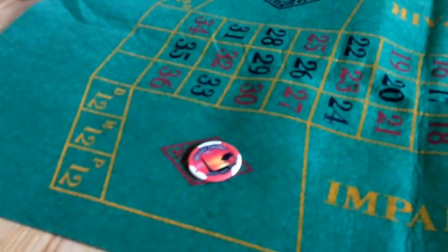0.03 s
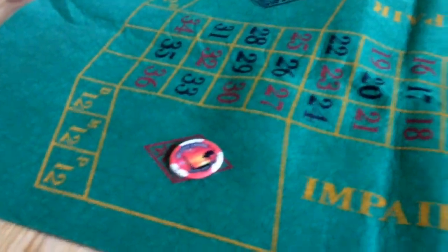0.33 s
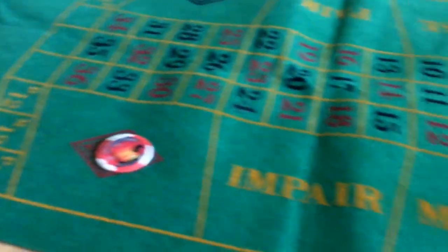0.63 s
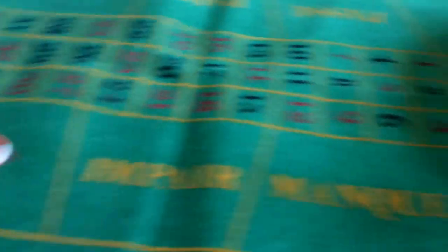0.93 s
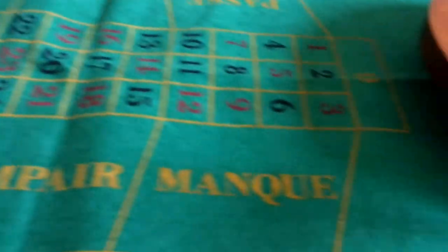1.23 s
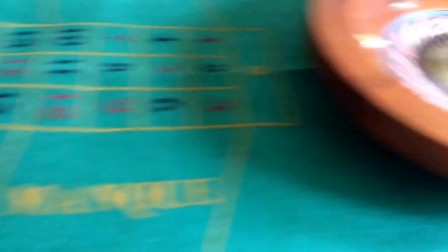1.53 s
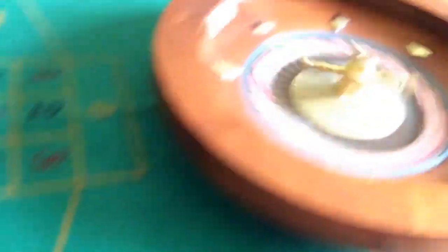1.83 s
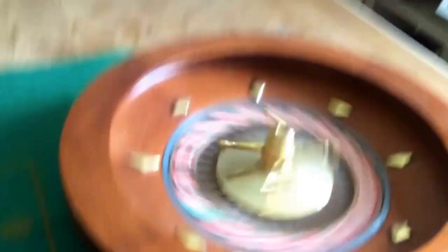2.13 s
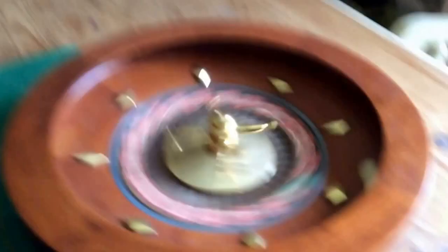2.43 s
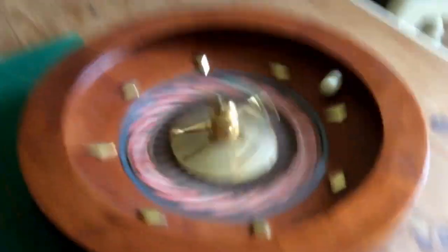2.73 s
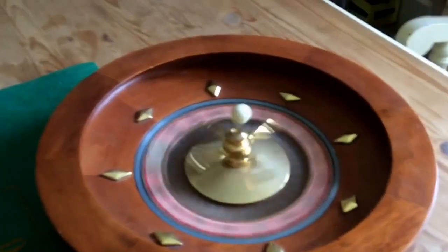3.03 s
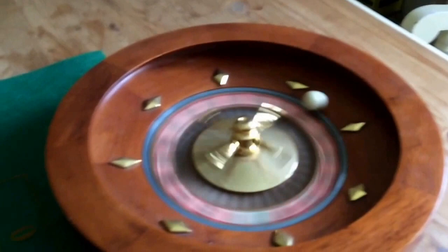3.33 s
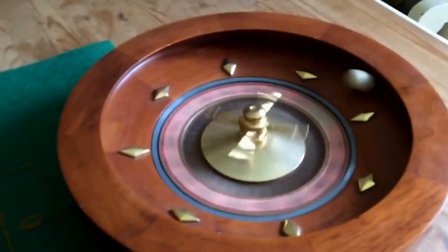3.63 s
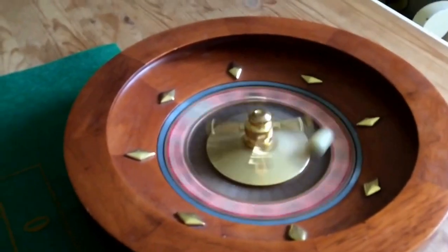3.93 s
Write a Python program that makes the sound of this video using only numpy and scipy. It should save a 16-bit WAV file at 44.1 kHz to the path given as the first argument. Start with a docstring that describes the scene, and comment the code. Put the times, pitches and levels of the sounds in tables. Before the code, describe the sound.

A wooden roulette wheel is spun with a gritty scrape and a rolling clatter. The ball knocks around the bowl, then cracks against metal studs and clinks on the ringing brass centre, close by in a small room.

```python
"""A wooden roulette wheel on a table in a small room. First come faint clinks and two dull bumps that set the
table booming. From about 1 s the wheel is spun: a gritty scrape swells and fades, tiny rolling contacts rumble
and clatter, and the wooden bowl knocks under the hand that turns it. From about 2.2 s the ball is launched and
knocks round the wooden bowl; from about 2.7 s it also cracks against metal studs, then clanks on the metal
centre cone and sets the brass turret ringing. Each impact is a brief broadband pulse; bowl, cone and turret
ring on in damped modes."""
import sys
import numpy as np
from scipy import signal
from scipy.fft import rfft, irfft
from scipy.io import wavfile
from scipy.ndimage import uniform_filter1d

SR = 44100
rng = np.random.default_rng(int(sys.argv[2]) if len(sys.argv) > 2 else 0)


def unload_audio(sound):
    """Save the sound as a 16-bit wav file, at the path given as the first command line argument."""
    columns = np.transpose(np.atleast_2d(sound))
    # keep every value between -1 and 1, then stretch to whole-number steps
    steps = np.round(np.clip(columns, -1, 1) * 32767)
    wavfile.write(sys.argv[1], SR, steps.astype(np.int16))


N = 176400

# Dull bumps on the table: start_s, level_db
BUMPS = [(0, -51.5), (0.085, -45.5), (0.587, -28), (0.826, -32)]
# Knocks on the wooden bowl: start_s, level_db, treble_db, body_db
BOWL_KNOCKS = [(1.0135, -47, -6, 16), (1.1193, -26, -61, -16.5), (1.1926, -10, -31, -7.5),
               (1.456, -19.5, -57, -21), (1.4633, -16, -57, -24), (1.4744, -16, -66, -33),
               (1.4818, -12, -38, -7), (1.516, -17, -36, -2), (1.5535, -15, -26.5, -25),
               (1.574, -16.5, -26, -18), (1.6181, -10, -30, -6), (1.6636, -17, -30, -6),
               (1.6693, -14, -30.5, -12), (1.722, -20.5, -34, -13), (1.7635, -25.5, -34, -11),
               (1.8117, -24, -45, 0), (1.8823, -22.5, -50, -38), (2.0486, -27, -37, -7),
               (2.094, -32.5, -66, -19), (2.1917, -28, -105, -7), (2.2195, -14, -52, -19),
               (2.2397, -19, -40, -7), (2.2714, -18, -35, -13), (2.2892, -19, -45, -12),
               (2.4354, -24.5, -40, -9), (2.7388, -4.5, -23.5, -11.5), (2.7971, -8.5, -25, -21),
               (2.842, -10.5, -34, -17.5), (2.883, -13, -26, -26), (2.9153, -17, -33, -18),
               (3.2301, -8, -1, -48), (3.3126, -3, -21, -11), (3.3839, -7.5, -26, -22),
               (3.7148, -6, -19, -11), (3.721, -3.5, -18, -58), (3.7268, -12, -8.5, 5),
               (3.7809, -11, -27, -14), (3.8241, -14, -37, -36), (3.8609, -17, -36, -26)]
# Hard hits on the studs: start_s, level_db, thud_db
STUD_HITS = [(2.657, -11.5, -32), (3.1503, -6.5, -31), (3.562, -6.5, -14)]
# Metal hits on the centre cone and on the separators between pockets: start_s, level_db, tilt_db_per_octave,
# hollow_pitch_hz
CONE_HITS = [(2.9471, -21.5, 0.5, 1333), (3.1304, -21.5, -1.5, 3970), (3.206, -20, -0.5, 2060),
             (3.2302, -14.5, 4, 1856), (3.2861, -19, 2, 1512), (3.6334, -19, -0.5, 2950),
             (3.917, -23, -2, 2260)]
# Hits on the turret: start_s, ring_db, lowest_mode_db, cross_arms_db, tick_db
TURRET_HITS = [(0.076, -69, -56.5, -63, -46), (0.2556, -43.5, -56.5, -66, -39),
               (2.9735, -20.5, -19, -40, -24.5), (3.0544, -14, -18, -8, -14.5),
               (3.1866, -15, -22, -45, -20), (3.437, -9, -16.5, -17, -17), (3.478, -17, -22, -16, -20.5),
               (3.506, -26.5, -24, -38, -21.5), (3.5953, -16.5, -24.5, -34, -21),
               (3.9405, -27, -28, -61, -37), (3.9945, -12, -23, -14, -21)]

# Envelopes of the wheel's motion: time_s, level_db
RUMBLE_ENVELOPE = [(1.3, -76), (1.65, -48.5), (1.95, -61), (2.55, -55), (2.8, -56), (3.45, -52),
                   (3.65, -37), (3.85, -45), (4, -57)]
ROLLING_ENVELOPE = [(1.1, -81.5), (1.17, -56.5), (1.37, -67.5), (1.41, -43.5), (1.47, -41), (1.53, -40),
                    (1.68, -41.5), (1.82, -42), (1.9, -46.5), (2.15, -54.5), (2.4, -49), (2.6, -54.5),
                    (2.8, -51.5), (3.1, -55), (3.87, -42.5), (4, -55)]

# Normal modes of each body: frequency_hz, relative_level_db, t60_s
TABLE_MODES = [(130.4, 1, 0.58), (155.2, -3.5, 0.37), (174.4, 3, 0.31), (261.6, -2.5, 0.19)]
RIM_MODES = [(531, -8, .15), (1448, 0, .17), (2375, -8, .06)]
BOWL_MODES = [(531, -11, .14), (640, -13, .06), (1444, -7, .12), (1830, -5, .06), (2373, -3, .06),
              (2497, -1, .06), (2690, -2, .07), (2858, -2, .07), (3022, -5, .06), (3321, -6, .06),
              (5640, -11, .03)]
CONE_MODES = [(1485, -5.5, 0.054), (1774, -5, 0.06), (2006, 7, 0.027), (2600, 7, 0.015),
              (2905, -4.5, 0.094), (3960, -6.5, 0.12), (5580, -6, 0.025), (6300, -3.5, 0.028),
              (9450, -7, 0.014)]
TURRET_MODES = [(4443, -7, .2), (5768, -12, .19), (7234, -18, .15), (8850, -28, .08), (10570, -36, .07),
                (12230, -33, .08)]
TURRET_LOWEST_MODE = [(2179, -5.5, .4)]
CROSS_ARM_MODES = [(4660, 3, 0.016), (5770, -6, 0.039), (7780, -4, 0.029), (8300, -20, 0.054),
                   (9000, -12.5, 0.036), (9970, -19.5, 0.059)]

# Spectral densities of the sustained noises: frequency_hz, relative_level_db
AMBIENT_SPECTRUM = [(25, -4), (70, 1), (200, -4), (400, -14), (1100, -13), (2500, -24), (9000, -27),
                    (15500, -34)]
RUMBLE_SPECTRUM = [(40, -35), (110, -7.5), (200, -1.5), (290, -7), (420, -9), (800, -42)]
ROLLING_SPECTRUM = [(40, -38), (120, -4.5), (175, 5), (400, -11), (540, 5), (1200, 1), (2400, 6.5),
                    (3400, 0), (4500, -29), (8000, -21), (15500, -42)]
RASP_SPECTRUM = [(300, -32), (900, -15), (2400, 8), (5000, -6), (8000, -14), (15500, -26)]
# Spectral densities of the impacts: frequency_hz, relative_level_db
THUMP_SPECTRUM = [(30, -8.5), (110, 15.5), (400, -11.5), (650, 0), (1100, -25.5), (5000, -54)]
WOOD_SPECTRUM = [(60, -37), (170, -13.5), (380, -13.5), (560, 8), (800, 2), (1100, -5), (1800, -5),
                 (2700, 2), (3900, -0.5), (5700, 6), (7500, 0.5), (10000, -6), (15500, -22)]
STUD_SPECTRUM = [(100, -17.5), (600, 5.5), (1200, 4.5), (2600, 13.5), (4000, 10.5), (5800, 8.5), (9000, 9),
                 (11500, 1.5), (15500, -0.5)]
METAL_SPECTRUM = [(100, -21), (500, 4), (1300, 12.5), (2200, 3.5), (4500, 15.5), (7500, -5), (10000, -4),
                  (15500, -52)]

# Reverberation time of the room: frequency_hz, t60_s
ROOM_DECAY = [(500, 0.24), (6000, 0.21), (15000, 0.32)]
# Reflections from near surfaces: delay_s, level_db
EARLY_REFLECTIONS = [(.0032, -20), (0.0108, -17.5)]

KNOCK_DB, BOWL_RING_DB, TABLE_RING_DB, CONE_RING_DB = -3.5, -15, -43, -5  # added to each hit's level
GRAINS_PER_S, GRAIN_SPREAD_DB = 3200, 3.5
RIM_DB, RIM_DETUNE, RIM_SPOT_S = -1, 0.009, 0.05
RATTLES_PER_S, RATTLE_SPREAD_DB, RATTLE_DB = 85, 5, -4
RASP_PEAK_S, RASP_DB, RASP_RISE_DB_PER_S, RASP_FALL_DB_PER_S, GRIT_DB = 1.454, -36.5, 256, 90, 2
SPOT_COLOUR_DB, SPOT_DETUNE = 2, 0.05
AMBIENT_DB, REVERB_DB = -70, -6.5
LOW_CUT_HZ, HIGH_CUT_HZ = 36, 15550
BIN_HZ = np.fft.rfftfreq(2048, 1 / SR)  # frequency grid of the impact spectra


def amp(db):
    return 10 ** (np.asarray(db) / 20)


def unit_rms(x):
    return x / np.sqrt(np.mean(x ** 2) + 1e-20)


def curve_at(points, hz=BIN_HZ):
    """Interpolation on a logarithmic frequency axis."""
    point_hz, value = np.transpose(points)
    return np.interp(np.log(hz + 1), np.log(point_hz + 1), value)


def envelope(points):
    """Gain over time, interpolated in decibels."""
    return amp(np.interp(np.arange(N) / SR, *np.transpose(points)))


def add(mix, start_s, sound):
    """Superposition: a sound sums into the mix."""
    part = mix[max(round(start_s * SR), 0):][:len(sound)]
    part += sound[:len(part)]


def coloured(x, spectrum):
    """Linear filtering by a spectrum, scaled to rms 1."""
    gain = amp(curve_at(spectrum, np.fft.rfftfreq(len(x), 1 / SR)))
    return unit_rms(irfft(rfft(x) * gain, len(x)))


def impact(colour_db, rise_s):
    """A brief contact radiates a broadband pulse, here with the energy of 1 ms at rms 1."""
    t = np.arange(2 * len(BIN_HZ) - 2) / SR
    shape = t / rise_s * np.exp(-t / rise_s)
    burst = shape * rng.standard_normal(len(t))
    for _ in range(4):  # flatten the spectrum while keeping the envelope
        spectrum = rfft(burst)
        burst = shape * np.sign(irfft(spectrum / (abs(spectrum) + 1e-9)))
    log_gain = np.log(amp(np.r_[colour_db, colour_db[-2:0:-1]]))
    minimum_phase = np.exp(np.conj(signal.hilbert(log_gain)))
    pulse = np.fft.ifft(np.fft.fft(burst) * minimum_phase).real
    return pulse / np.sqrt(np.sum(pulse ** 2) / SR * 1000)


def ring(modes, rise_s, scatter_db, tilt_db=0):
    """Free vibration is a sum of damped modes, whose balance varies with the struck spot."""
    t = np.arange(SR * 3 // 4) / SR
    hz, db, t60 = np.transpose(modes)[:, :, None]
    octaves = np.log2(hz / np.exp(np.log(hz).mean()))
    db = db + tilt_db * octaves + scatter_db * rng.standard_normal(hz.shape)
    waves = amp(db - 60 * t / t60) * np.sin(2 * np.pi * (hz * t + rng.random(hz.shape)))
    return waves.sum(0) * (1 - np.exp(-t / rise_s))


def spot_colour():
    """The bowl's response depends on the point of contact: random peaks and dips in dB."""
    return SPOT_COLOUR_DB * unit_rms(uniform_filter1d(rng.standard_normal(len(BIN_HZ)), size=22))


def ambience():
    """Stationary noise, faint and strongest in the bass."""
    return amp(AMBIENT_DB) * coloured(rng.standard_normal(N), AMBIENT_SPECTRUM)


def room(x):
    """Reverberation: early reflections and an exponentially decaying diffuse field join the sound."""
    hz, t, noise = signal.stft(rng.standard_normal(SR * 3 // 4), SR, nperseg=256)
    decay = amp(-60 * t / curve_at(ROOM_DECAY, hz)[:, None])
    tail = signal.istft(noise * decay, SR, nperseg=256)[1]
    tail *= np.minimum(np.arange(len(tail)) / SR / 0.0031, 1)
    response = amp(REVERB_DB) * tail / np.linalg.norm(tail)
    for delay_s, db in EARLY_REFLECTIONS:
        add(response, delay_s, amp([db]))
    return x + signal.fftconvolve(x, response)[:N]


def table_bumps():
    """A soft blow has a long contact time, so it thumps and excites the table's low modes."""
    out = np.zeros(N)
    for start_s, db in BUMPS:
        add(out, start_s, amp(db) * ring(TABLE_MODES, rise_s=0.04, scatter_db=-0.7))
        add(out, start_s, amp(db + 3) * impact(curve_at(THUMP_SPECTRUM), rise_s=0.006))
    return out


def wheel_rumble():
    """Random vibration of the turning wheel radiates low-frequency noise."""
    return envelope(RUMBLE_ENVELOPE) * coloured(rng.standard_normal(N), RUMBLE_SPECTRUM)


def rattle():
    """A Poisson process of small woody clicks, at rms 1."""
    occurs = rng.random(N) < RATTLES_PER_S / SR
    clicks = occurs * amp(RATTLE_SPREAD_DB * np.minimum(rng.exponential(1, N), 2.5))
    spot = rng.integers(0, 10, N)
    colour_db = curve_at(WOOD_SPECTRUM) + curve_at([(3000, 14), (8000, -18)])
    out = np.zeros(N)
    for k in np.unique(spot):
        response = impact(colour_db + spot_colour(), rise_s=0.0006)
        out += signal.fftconvolve(clicks * (spot == k), response)[:N]
    return unit_rms(out)


def rolling():
    """Forced vibration: tiny contacts drive the bowl and its hollow rim, whose pitch varies by spot."""
    grains = (rng.random(N) < GRAINS_PER_S / SR) * rng.standard_normal(N)
    grains *= amp(GRAIN_SPREAD_DB * np.minimum(rng.exponential(1, N), 3.5))
    spot = rng.integers(0, 6, N)[(np.arange(N) / SR / RIM_SPOT_S).astype(int)]
    rim = np.zeros(N)
    for k in np.unique(spot):
        modes = [(hz * (1 + RIM_DETUNE * rng.standard_normal()), db, t60) for hz, db, t60 in RIM_MODES]
        rim += signal.fftconvolve(grains * (spot == k), ring(modes, rise_s=0.001, scatter_db=2))[:N]
    bowl = coloured(grains, ROLLING_SPECTRUM) + amp(RIM_DB) * unit_rms(rim) + amp(RATTLE_DB) * rattle()
    return envelope(ROLLING_ENVELOPE) * bowl


def wheel_rasp():
    """Friction noise: a gritty scrape swells as the wheel is pushed and fades as it runs free."""
    t = np.arange(N) / SR - RASP_PEAK_S
    grit = np.clip(unit_rms(uniform_filter1d(rng.standard_normal(N), size=120)), -2, 2)
    scrape = coloured(amp(GRIT_DB * grit) * rng.standard_normal(N), RASP_SPECTRUM)
    swell_db = np.minimum(RASP_RISE_DB_PER_S * t, -RASP_FALL_DB_PER_S * t)
    return amp(RASP_DB + swell_db) * scrape


def bowl_knocks():
    """Impact excitation: a woody crack, a short ring of the bowl and a faint boom of the table."""
    out = np.zeros(N)
    treble_weight = curve_at([(3000, 0.028), (9500, 1.0)])
    body_weight = curve_at([(900, 0.91), (1700, 0.16)])
    for start_s, db, treble_db, body_db in BOWL_KNOCKS:
        wood_db = curve_at(WOOD_SPECTRUM, BIN_HZ * (1 + SPOT_DETUNE * rng.standard_normal()))
        colour_db = wood_db + treble_db * treble_weight + body_db * body_weight + spot_colour()
        add(out, start_s, amp(db + KNOCK_DB) * impact(colour_db, rise_s=0.0011))
        bowl = ring(BOWL_MODES, rise_s=0.00053, scatter_db=3.5)
        add(out, start_s, amp(db + KNOCK_DB + BOWL_RING_DB) * bowl)
        table = ring(TABLE_MODES, rise_s=0.003, scatter_db=1.8, tilt_db=6)
        add(out, start_s, amp(db + TABLE_RING_DB) * table)
    return out


def stud_cracks():
    """Momentum transfer: the ball cracks against a stud and jolts the whole wheel."""
    out = np.zeros(N)
    jolt_time = np.arange(SR // 10) / SR / 0.0019  # in time constants of 1.9 ms
    thud = (1 - jolt_time) * np.exp(-jolt_time)
    for start_s, db, thud_db in STUD_HITS:
        add(out, start_s, amp(db) * impact(curve_at(STUD_SPECTRUM), rise_s=0.00059))
        add(out, start_s, amp(thud_db + 2.5) * thud)
    return out


def cone_clanks():
    """Strongly damped modes make the cone clank, led by the hollow tone of the struck spot."""
    out = np.zeros(N)
    for start_s, db, tilt_db, hollow_hz in CONE_HITS:
        colour_db = curve_at(METAL_SPECTRUM) + tilt_db * np.log2(BIN_HZ / 3000 + 0.05)
        add(out, start_s, amp(db) * impact(colour_db, rise_s=0.001))
        clank = ring(CONE_MODES, rise_s=0.0003, scatter_db=2, tilt_db=tilt_db)
        add(out, start_s, amp(db + CONE_RING_DB) * clank)
        add(out, start_s, amp(db) * ring([(hollow_hz, 1.5, 0.048)], rise_s=0.0005, scatter_db=0))
    return out


def turret_clinks():
    """Inharmonic modes of the brass turret and its cross arms ring; harder ticks are brighter."""
    out = np.zeros(N)
    for start_s, ring_db, lowest_db, arms_db, tick_db in TURRET_HITS:
        for modes, db in (TURRET_MODES, ring_db), (TURRET_LOWEST_MODE, lowest_db), (CROSS_ARM_MODES, arms_db):
            add(out, start_s, amp(db) * ring(modes, rise_s=0.0007, scatter_db=1.2))
        tilt_db = 0.24 * (tick_db + 35.5)
        colour_db = curve_at(METAL_SPECTRUM) + tilt_db * np.log2(BIN_HZ / 3000 + 0.26)
        add(out, start_s, amp(tick_db) * impact(colour_db, rise_s=0.0012))
    return out


def scene():
    """Superposition of the reverberant ball and wheel, the bumps and the ambience, in mono."""
    ball = bowl_knocks() + stud_cracks() + cone_clanks() + turret_clinks()
    wheel = rolling() + wheel_rumble() + wheel_rasp()
    return (room(ball + wheel) + table_bumps() + ambience())[None]


def record(dry):
    """Band limiting: filters remove the deepest bass and the highest treble."""
    highpass = signal.butter(2, LOW_CUT_HZ, "highpass", fs=SR, output="sos")
    lowpass = signal.firwin(511, HIGH_CUT_HZ, window=("kaiser", 9), fs=SR)
    return signal.oaconvolve(signal.sosfilt(highpass, dry), lowpass[None], "same")


dry = scene()
out = record(dry)
unload_audio(out)
```